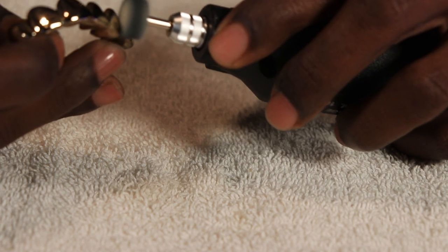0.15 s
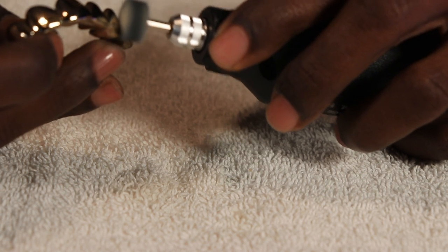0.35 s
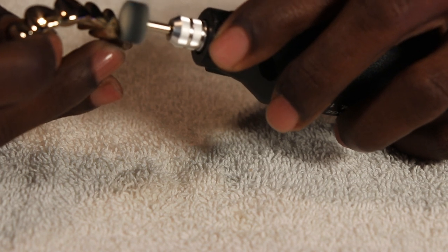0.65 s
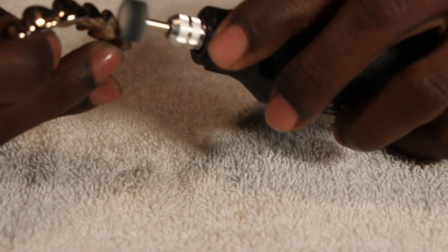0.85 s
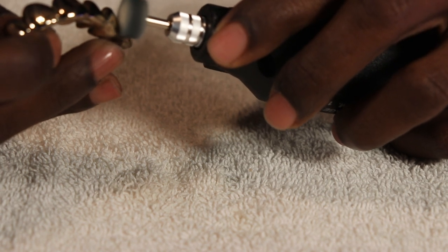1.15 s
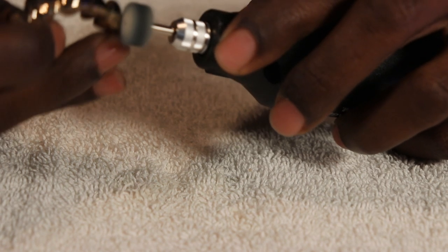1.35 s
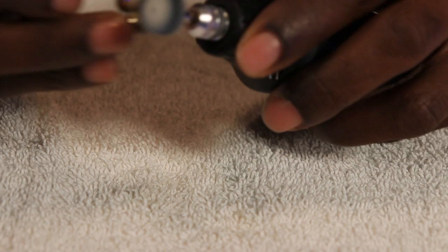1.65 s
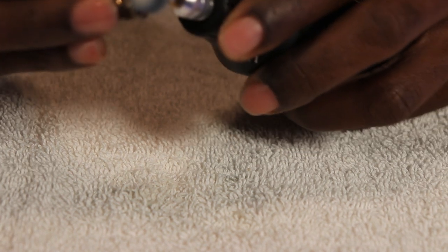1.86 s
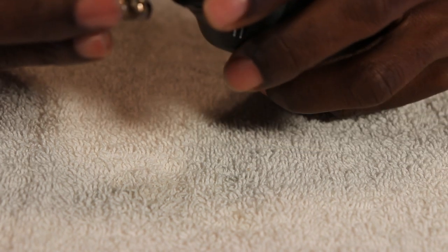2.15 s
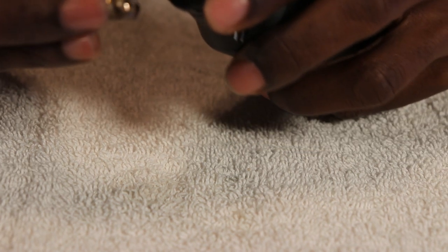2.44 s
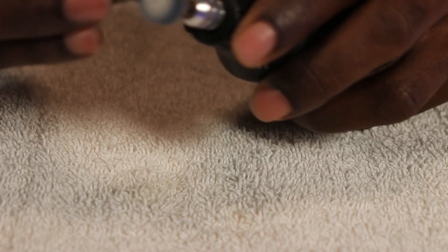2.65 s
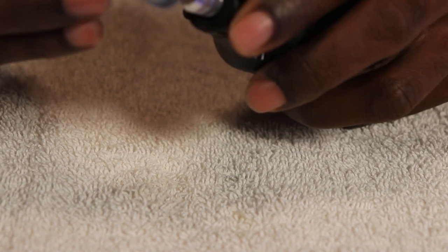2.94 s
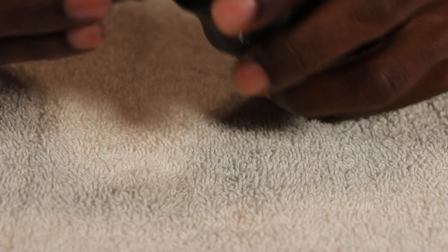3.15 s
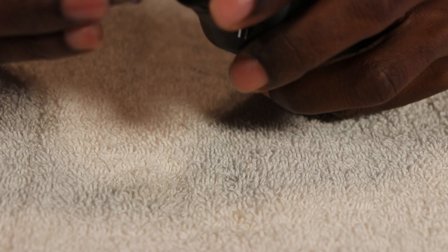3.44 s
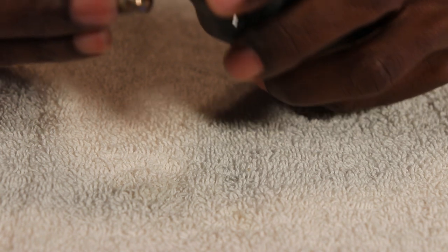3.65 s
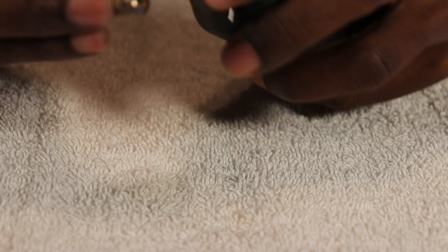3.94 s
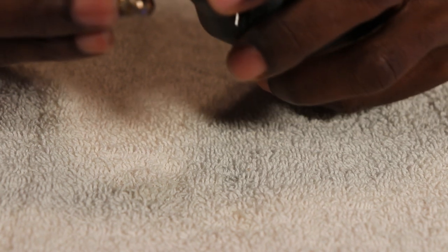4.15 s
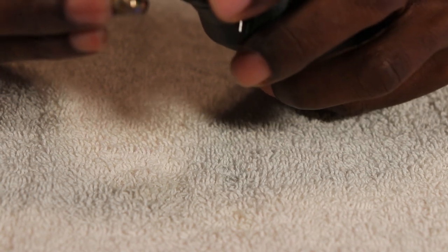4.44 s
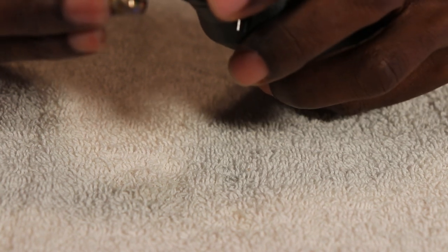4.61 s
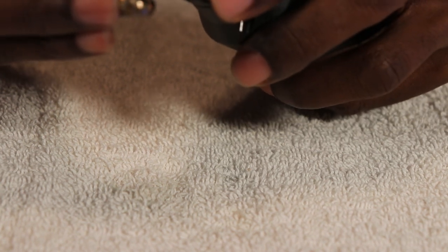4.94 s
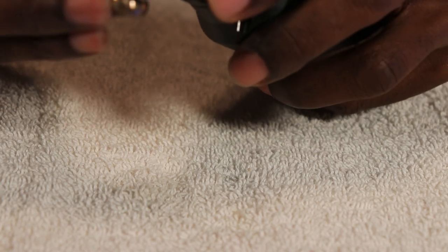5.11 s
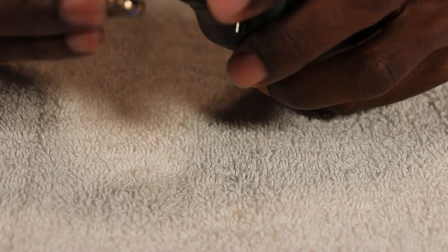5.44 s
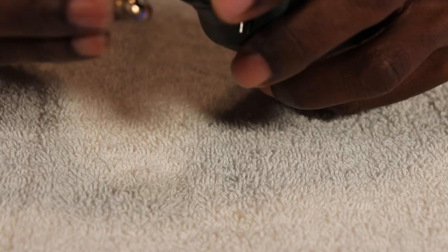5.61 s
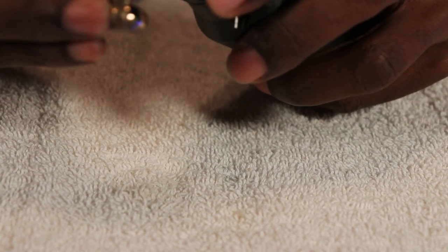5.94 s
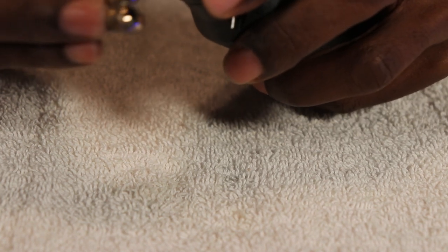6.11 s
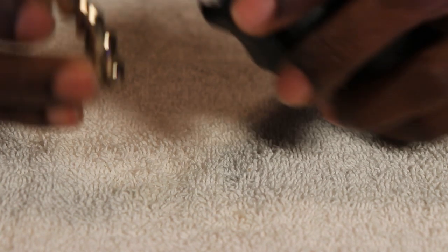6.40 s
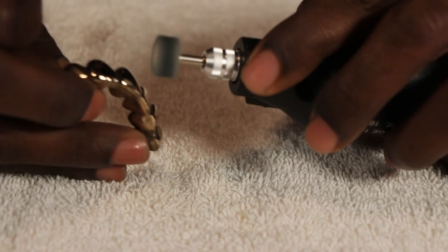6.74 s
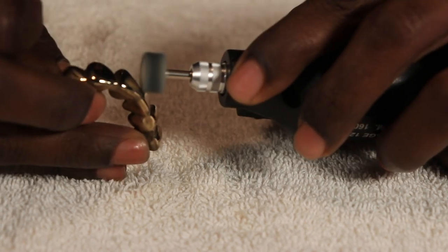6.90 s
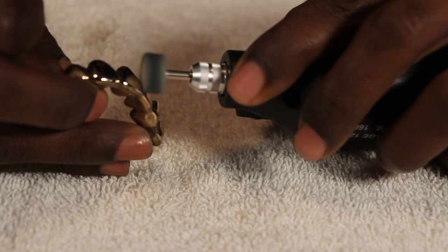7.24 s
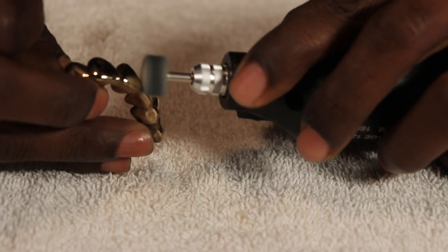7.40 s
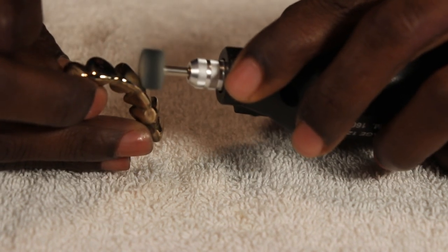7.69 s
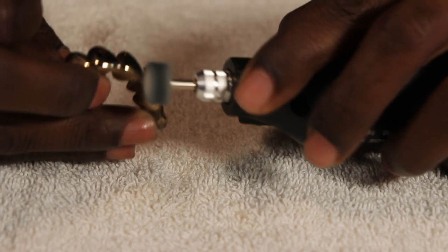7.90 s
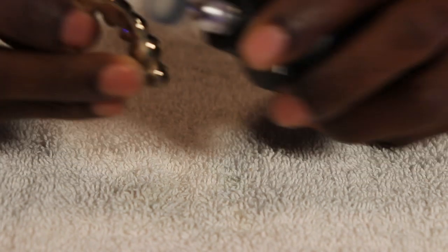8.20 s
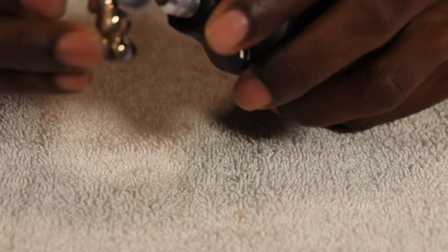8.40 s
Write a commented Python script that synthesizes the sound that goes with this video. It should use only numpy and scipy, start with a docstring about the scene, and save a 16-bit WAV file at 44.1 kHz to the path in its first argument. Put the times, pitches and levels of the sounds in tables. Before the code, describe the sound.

A small electric polishing tool buzzes steadily against metal jewelry, sagging under pressure and rising briefly when lifted.

```python
"""A small three-pole rotary tool spins a felt wheel against a metal bracelet, near a two-port microphone.
Whatever repeats each shaft turn sounds as harmonics of the speed, which sags under load; one harmonic
beams out as a thin whine. Brushes and wheel hiss through the housing resonances, a bearing ticks once
a turn, and the hand covers and opens the body. The room hums and rumbles faintly."""
import sys
import numpy as np
from scipy import signal
from scipy.fft import rfft, irfft, next_fast_len
from scipy.io import wavfile
from scipy.ndimage import uniform_filter1d, map_coordinates

SR = 44100
rng = np.random.default_rng(int(sys.argv[2]) if len(sys.argv) > 2 else 0)


def dump(signal):
    """Clip the signal to [-1, 1] and save it as 16-bit WAV at the path in sys.argv[1]."""
    limited = np.clip(np.atleast_2d(signal).T, -1, 1)
    pcm = np.round(limited * 32767).astype(np.int16)
    wavfile.write(sys.argv[1], SR, pcm)


N = 377487
TIME = np.arange(next_fast_len(N)) / SR
BINS = np.maximum(np.fft.rfftfreq(len(TIME), 1 / SR), 1)


def undb(db):
    """Amplitude ratio of a level."""
    return 10 ** (np.asarray(db) / 20)


def level(x, db):
    """RMS normalisation to a level."""
    return x * undb(db) / np.sqrt(np.mean(x ** 2))


def curve(table, at=TIME):
    """Linear interpolation of each column in time."""
    t, *columns = np.transpose(table)
    return [np.interp(at, t, c) for c in columns]


def shape(table, hz=BINS):
    """Interpolation on a log-frequency axis."""
    f, v = np.transpose(table)
    return np.interp(np.log(hz), np.log(f), v)


def walk(rows, span, count):
    """Low-pass noise of unit variance in count columns, correlated over about span rows."""
    x = rng.standard_normal((rows, count))
    x = uniform_filter1d(uniform_filter1d(x, span, axis=0), span, axis=0)
    return x / x.std()


def spell(at, start, end, edge):
    """A gate from start to end with soft edges."""
    return (1 + np.tanh((at - start) / edge)) * (1 + np.tanh((end - at) / edge)) / 4


# Likeness of the sound at the two ports: f/Hz, correlation
COHERENCE = [(60, 1), (200, 0.73), (700, 0.73), (1400, 0.25), (4000, 1), (8000, 0.54), (13000, 0.19)]
def noise_pair(gain=1):
    """Partial coherence: noise of a given spectrum at two ports that agree less in the treble."""
    alike = shape(COHERENCE)
    mid, side = (rfft(rng.standard_normal(len(TIME))) * gain for _ in range(2))
    mid, side = mid * np.sqrt(1 + alike), side * np.sqrt(1 - alike)
    return irfft(np.array([mid + side, mid - side]), len(TIME)) / np.sqrt(2)


FREE_HZ, LOADED_HZ, SAG_HZ = 85.19, 79.5, 3.0  # a sag of SAG_HZ counts as full load
# The wheel rests on the metal: touch t/s, lift t/s, speed lost/Hz
TOUCHES = [(-0.52, 1.544, 3.13), (2.0, 2.69, 0.99), (3.18, 6.34, 3.56), (7.17, 8.05, 2.76)]
# Harder pushes as it rides over the links: t/s, speed lost/Hz, half length/s
PUSHES = [(0.01, 4.87, 0.09), (0.24, 3.7, 0.11), (0.451, 4.04, 0.08), (0.676, 3.95, 0.12),
          (0.899, 5.5, 0.11), (0.942, 3.6, 0.051), (1.123, 4.7, 0.11), (1.321, 3.45, 0.078),
          (1.46, 1.07, 0.04), (2.129, 3.7, 0.16), (2.289, 2.83, 0.07), (2.561, 4.01, 0.1),
          (3.319, 2.15, 0.04), (3.551, 2.4, 0.06), (3.771, 1.7, 0.06), (3.871, 1.54, 0.06),
          (4.06, 5.05, 0.09), (4.277, 2.7, 0.067), (4.5, 3.25, 0.21), (4.94, 2.6, 0.25),
          (5.139, 1.49, 0.23), (5.48, 4.15, 0.24), (5.981, 4.03, 0.23), (6.23, 4.9, 0.1), (7.15, 2.2, 0.07),
          (7.45, 2.3, 0.065), (7.682, 4.76, 0.075), (7.9, 4.03, 0.1)]
def speed(at):
    """Friction loading: every touch and push lowers the shaft's rotation frequency."""
    resting = sum(lost * spell(at, touch, lift, edge=0.0352) for touch, lift, lost in TOUCHES)
    pushing = sum(lost * np.exp(-((at - t) / half) ** 2) for t, lost, half in PUSHES)
    return FREE_HZ - resting - pushing


# Height of the hands above the table: t/s, raised fraction
RAISED = [(0, 0), (1.45, 0), (1.7, 0.99), (6.3, 1), (6.6, 0), (8.15, 0.01), (8.35, 1), (8.56, 0.98)]
def posed(states, load, raised):
    """Bilinear blend of four states: free and low, free and raised, loaded and low, loaded and raised."""
    low_db, high_db = (states[k] + load * (states[k + 2] - states[k]) for k in range(2))
    return low_db + raised * (high_db - low_db), low_db, high_db


def harmonics(turn, order, db, slip_rad, spread_rad, steps=2048):
    """Fourier synthesis: one waveform a turn, blended into the next; db is (turns, orders)."""
    rows, count = db.shape
    shared = rng.uniform(0, 2 * np.pi, count) + slip_rad * walk(rows, 4, count)
    apart = spread_rad * walk(rows, 13, count)  # each tone leaves the body at its own place
    ports = []
    for phase in (shared + apart, shared - apart):
        spectrum = np.zeros((rows, steps // 2 + 1), complex)
        spectrum[:, order] = undb(db) * np.exp(1j * phase) * steps / np.sqrt(2)
        cycles = irfft(spectrum, steps)
        cycles = np.hstack([cycles, cycles[:, :1]])
        ports.append(map_coordinates(cycles, [turn, turn % 1 * steps], order=1))
    return np.array(ports)


BARS = 3  # commutator bars
# Strong harmonics: order (its whole part sounds), relative level/dB in each of the four states
STRONG_TONES = [(3.017, -68.5, -70, -70, -71), (6.001, -71.5, -71, -75, -68.5), (8, -73, -79, -64.5, -63.5),
                (9, -63, -70, -59.5, -59.5), (10, -68.5, -70, -73.5, -76), (11.021, -52, -51, -50.5, -52.5),
                (12, -71, -73, -67.5, -65.5), (14, -58.5, -54.5, -62, -62), (15, -53, -54, -57, -58),
                (17, -63, -58.5, -58, -58.5), (18, -54.5, -56, -61, -58), (22, -52.5, -55.5, -55, -58.5),
                (25, -52, -52.5, -57.5, -68.5), (26, -51.5, -52.5, -53, -61), (27, -54.5, -61, -59.5, -58),
                (28, -49, -53.5, -56.5, -54.5), (29, -59, -58.5, -53.5, -60),
                (30, -52.5, -56, -55.5, -53.5), (31, -57, -72, -56, -54), (32, -69, -69, -54, -59.5),
                (33, -55.5, -55.5, -50.5, -53), (39, -71, -61, -66, -53.5), (41, -61, -62.5, -74, -77),
                (44, -59, -68, -72, -70), (45, -55, -59, -57.5, -62.5), (46, -61, -53, -61, -70),
                (47, -65.5, -55, -59, -64.5), (48, -64, -52.5, -61, -60), (57, -60.5, -61, -64, -72),
                (63, -66, -61, -62, -70.5), (66, -61, -60, -58, -63), (87, -60, -56, -72, -64),
                (93, -59.5, -63, -55, -63), (105, -68, -61, -52, -62.5), (108, -62, -68, -58, -67),
                (117, -57, -63.5, -69, -63), (150, -56, -63, -82, -67), (156, -53, -69, -64, -67),
                (159, -56, -71, -62, -63), (165, -73, -73, -68.5, -63), (168, -67, -75.5, -71, -62),
                (171, -69, -69.5, -66.5, -63), (180, -64.5, -66, -69, -76)]
# Envelope of the faint ones between them: order, relative level/dB
FAINT_TONES = [(7, -74), (13, -74), (21, -65.5), (36, -65.5), (54, -66), (96, -71), (126, -68.5),
               (177, -78)]
def line_spectrum(between_bars_db=-3.5, scatter_db=2.5):
    """Periodicity: lines at multiples of the speed; high up, only multiples of the bar rate remain."""
    strong = np.transpose(STRONG_TONES)
    faint = np.setdiff1d(np.r_[7:72, 72:180:BARS], np.r_[strong[0], WHINE_ORDER])
    faint_db = shape(FAINT_TONES, faint) + between_bars_db * (faint % BARS > 0)
    faint_db = faint_db + scatter_db * rng.standard_normal((len(faint), 4)).T
    both = np.hstack([strong, np.vstack([faint, faint_db])])
    return both[:, np.argsort(both[0])]


def motor_tones(turn, turn_times, load):
    """Amplitude and phase modulation: the wheel's uneven drag makes the shaft harmonics flutter."""
    turns, load = len(turn_times), load[:, None]
    order, *states = line_spectrum()
    db, low_db, high_db = posed(states, load, curve(RAISED, turn_times)[0][:, None])
    # the pose only shares out the power within a band
    band = np.searchsorted(BAND_EDGES, order * (FREE_HZ - SAG_HZ))
    same_band = band[:, None] == band
    db = db - 10 * np.log10(undb(2 * db) @ same_band / (undb(low_db + high_db) @ same_band))
    # the housing resonances stay put while the tones slide through them
    tone_hz = order * speed(turn_times)[:, None]
    usual_hz = order * (FREE_HZ + load * (LOADED_HZ - FREE_HZ))
    db = db + 1.3 * (shape(HOUSING, tone_hz) - shape(HOUSING, usual_hz))
    ringing = np.clip(np.minimum((order - 4) / 16, 70 / order), .5, 1)  # most where the housing rings
    own = walk(turns, 3, len(order))
    together = uniform_filter1d(walk(turns, 4, len(order)), size=5, axis=1)
    flutter_db = ringing * ((1.5 + 1.4 * load) * own + 1.2 * load * together)
    slip_rad = ringing * (0.38 + 0.27 * load) + .0016 * order  # high tones feel every wobble of speed
    spread_rad = 0.42 * ringing + 0.0021 * order
    return harmonics(turn, order.astype(int), db + flutter_db, slip_rad, spread_rad)


# Hiss spectrum with the housing resonances: f/Hz, relative spectral density/dB
HOUSING = [(420, -103), (820, -94.5), (1480, -90), (1950, -86.5), (2550, -79.5), (2800, -86), (3450, -92.5),
           (4020, -84), (4550, -89.5), (6350, -92), (7550, -85), (10900, -93), (13100, -88.5), (14000, -93)]
def brush_hiss(turn, drag):
    """Friction noise of brushes and wheel, chopped unevenly by the bars and filtered by the housing."""
    bar = BARS * turn
    size = undb(2.5 * rng.standard_normal(N // 100))[bar.astype(int)]
    chop = 1 + 1.05 * np.exp(-(bar % 1) / 0.39) * size
    friction = noise_pair() * level(chop, 0) * undb(0.46 * drag)  # the felt rasps under load
    return irfft(rfft(friction) * undb(shape(HOUSING)) * np.sqrt(SR / 2), len(TIME))


# One row a band (motor, housing, vents, bearing, air): base level/dB in each of the four states
BANDS = [(-48, -47, -46.5, -47), (-44, -43.5, -42.5, -43.5), (-46, -45, -46.5, -44.5),
         (-49, -49, -49.5, -50), (-49.5, -48, -52.5, -50)]
# The tool drifts before the microphone: t/s, gain/dB, housing band gain/dB, left minus right/dB
DRIFT = [(0, 0.5, .2, -2.9), (1.2, -.5, -0.1, -2.6), (1.5, 1.2, .2, -3.3), (1.65, .5, -2, -3),
         (2.3, 0, -4, -2.3), (3.1, .2, -4, -2.7), (3.5, -0.7, -4.5, -1.7), (3.8, -0.2, -2, -1.9),
         (4.6, -0.5, -3, -2.3), (5.6, -1, -3, -2.1), (6.2, -0.4, -2.5, -1.5), (6.4, 1.2, -3.5, -2.6),
         (6.8, 0.7, 1, -3.8), (7.85, 0.25, 2, -2.6), (8.1, 1.5, 1, -3.6), (8.3, -1, 0, -3.2),
         (8.56, 0.3, -3, -3)]
def band_levels(drag, rasp_db_per_hz=.4, surge_db_s_per_hz=.035):
    """Radiation by band: the housing rasps as the shaft labours; vents and bearing roar as it speeds up."""
    near_db, housing_db, _ = curve(DRIFT)
    raised, hz = curve(RAISED)[0], speed(TIME)
    motor, housing, vents, bearing, air = (posed(row, drag, raised)[0] + near_db for row in BANDS)
    rasp_db = rasp_db_per_hz * np.maximum(LOADED_HZ - hz, 0)
    surge_db = surge_db_s_per_hz * np.maximum(np.gradient(hz) * SR, 0)
    return [motor, housing + housing_db + rasp_db, vents + surge_db, bearing + surge_db, air]


# Crossovers between the five bands: f/Hz
BAND_EDGES = [1900, 2900, 6400, 10500]
def grip(body, bands_db, turn_times):
    """Shielding: the hand lets the sound out band by band; restless fingers shake all but the lowest."""
    above = [1] + [np.clip(.5 + 3 * np.log2(BINS / f), 0, 1) for f in BAND_EDGES] + [0]
    tremble_db = 0.6 * walk(len(turn_times), 4, len(bands_db))
    tremble_db[:, 0] = 0
    spectrum, out = rfft(body), 0
    for k, band_db in enumerate(bands_db):
        band = irfft(spectrum * (above[k] - above[k + 1]), len(TIME))
        out = out + level(band, 0) * undb(band_db + np.interp(TIME, turn_times, tremble_db[:, k]))
    return out


# Spells in which the bearing rattles: t/s, length/s, level/dB relative to the bearing band
RATTLES = [(1.403, 0.69, -1.5), (2.188, 0.089, 0.5), (2.34, 0.093, 3), (2.62, .58, -2), (3.37, .11, 2),
           (3.759, 0.14, -1), (6.299, 0.31, 0.5), (8.12, 0.58, 0)]
def bearing_ticks(turn, band_db, ring_hz=7700, width_hz=1800, quiet_db=-25.5):
    """Impact excitation: a knock once a turn, never twice the same, rings the bearing seat."""
    size = undb(1.3 * rng.standard_normal(N // 100))[turn.astype(int)]
    place = turn % 1
    knocks = noise_pair() * size * np.exp(-place / .14) * np.minimum(place / 0.041, 1)
    seat = 1 / (1 + 1j * (BINS ** 2 - ring_hz ** 2) / (BINS * width_hz)) ** 2
    ring = irfft(rfft(knocks) * seat, len(TIME))
    rattle = sum(undb(db) * spell(TIME, t, t + length, edge=0.033) for t, length, db in RATTLES)
    return level(ring, band_db) * (undb(quiet_db) + rattle)


WHINE_ORDER = 60
# The whine's beam toward the microphone: t/s, gain/dB
BEAM = [(0, -4), (1.35, -4), (1.54, 4), (1.9, -2.5), (2.4, 1.5), (3.0, 1.5), (4.3, 2.5), (4.74, 5.5),
        (5.4, 1.5), (6.3, 1.5), (6.5, 5), (6.87, 9.5), (7.31, 10.5), (7.5, 4.5), (7.95, -2), (8.06, 7),
        (8.3, 2.5), (8.56, 4)]
def whine(turn, turn_times, load, base_db=-52, load_db=-7):
    """Directivity: one high harmonic swells and fades as the tool is turned, and weakens under load."""
    db = base_db + load_db * load + curve(BEAM, turn_times)[0]
    db = db[:, None] + .8 * walk(len(turn_times), 8, 1)
    return harmonics(turn, np.array([WHINE_ORDER]), db, slip_rad=0.42, spread_rad=0.52)


# Balance of the tool at the two ports: f/Hz, left minus right/dB
PORT_BALANCE = [(700, 1.5), (1300, 1), (2400, -.5), (4400, 0.2), (8000, 1), (10500, 0.1), (12000, -7),
                (15000, -7)]
def at_ports(sound):
    """Level difference between the ports: it varies with the tool's position and with frequency."""
    pan_db, tilt_db = curve(DRIFT)[2], shape(PORT_BALANCE)
    panned = sound * undb(np.array([pan_db, -pan_db]) / 2)
    tilt = undb(np.array([tilt_db, -tilt_db]) / 2)
    return irfft(rfft(panned) * tilt / np.sqrt(np.mean(tilt ** 2, axis=0)), len(TIME))


# Rumble spectrum: f/Hz, relative spectral density/dB
RUMBLE = [(20, -29), (45, -16), (75, -5.5), (130, -5), (200, -6.5), (245, -7), (320, -12), (460, -15),
          (600, -36)]
# Room hums: f/Hz, width/Hz, base level/dB
HUMS = [(72.8, 9, -67.5), (118.7, 5.4, -76), (277, 9.1, -80.5)]
# The room, loudest early on: t/s, hum gain/dB, rumble level/dB
ROOM_LEVELS = [(0, 0.5, -67.5), (1.2, 1, -66.5), (1.8, 1, -69.5), (3.5, 1.5, -70.5), (6.2, -2, -72),
               (6.8, -6, -74.5), (7.7, -3, -72), (8.56, -2, -74)]
def room():
    """Narrow-band noise wavers in amplitude: three such hums lie over a broad, low rumble."""
    hum_db, rumble_db = curve(ROOM_LEVELS)
    hums = sum(level(noise_pair(1 / (1 + (2 * (BINS - hz) / width) ** 2)), db) for hz, width, db in HUMS)
    return level(noise_pair(undb(shape(RUMBLE))), rumble_db) + hums * undb(hum_db)


def scene():
    """Superposition: the tool's sources, all locked to one shaft, add to the room."""
    turn = np.cumsum(speed(TIME)) / SR
    turn_times = np.interp(np.arange(int(turn[-1]) + 2), turn, TIME)
    load = np.clip((FREE_HZ - speed(turn_times)) / SAG_HZ, 0, 1)  # one value a turn
    drag = np.interp(TIME, turn_times, load)  # the same load, one value a sample
    body = motor_tones(turn, turn_times, load) + brush_hiss(turn, drag)
    bands_db = band_levels(drag)
    tool = grip(body, bands_db, turn_times) + bearing_ticks(turn, bands_db[3])
    tool = tool + whine(turn, turn_times, load)
    return (at_ports(tool) * undb(-0.53) + room())[:, :N]


def record(dry, top_hz=15770):
    """Band limiting: an elliptic low-pass cuts the top steeply."""
    return signal.sosfilt(signal.ellip(14, .2, 70, top_hz, fs=SR, output="sos"), dry)


dry = scene()
out = record(dry)
dump(out)
```